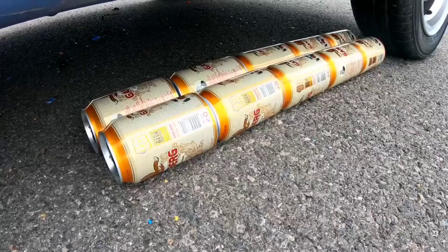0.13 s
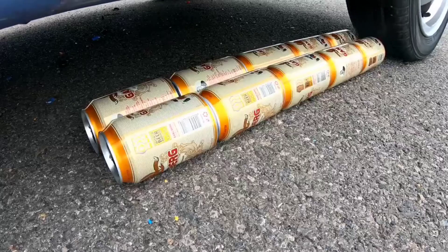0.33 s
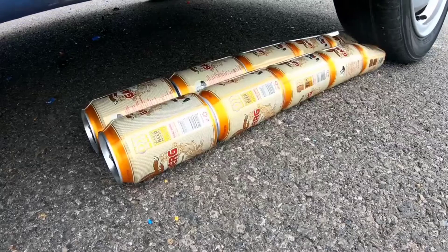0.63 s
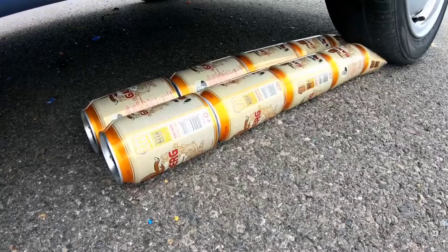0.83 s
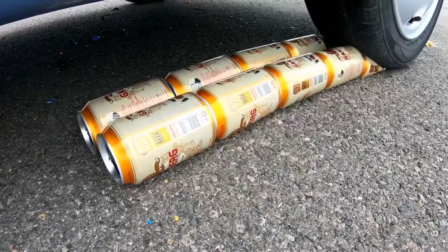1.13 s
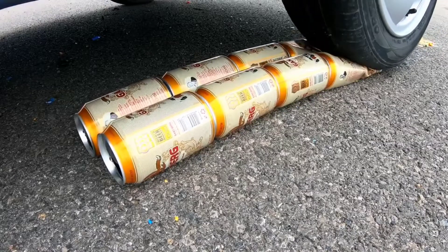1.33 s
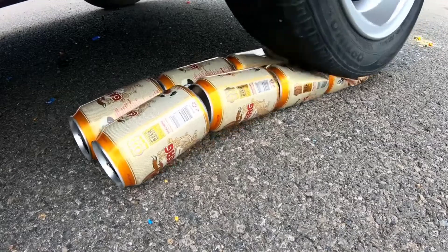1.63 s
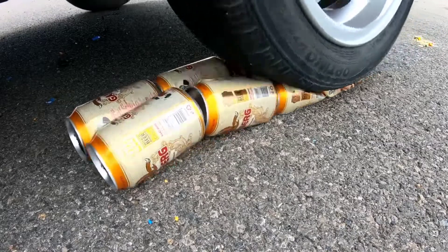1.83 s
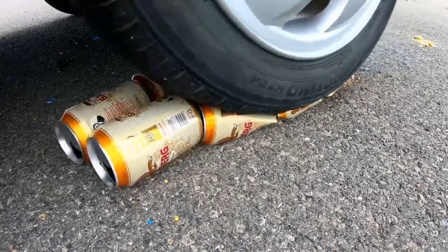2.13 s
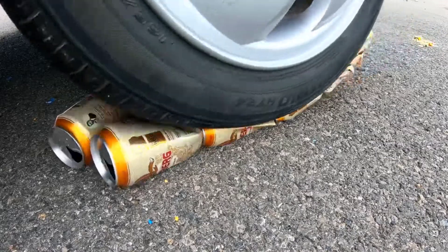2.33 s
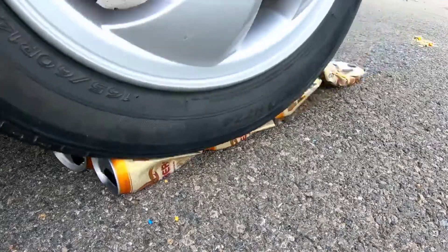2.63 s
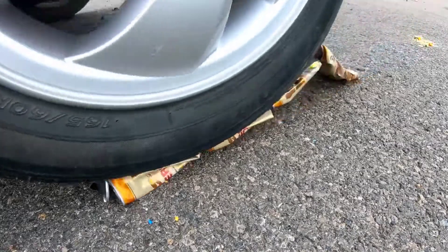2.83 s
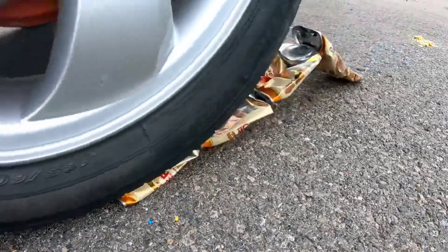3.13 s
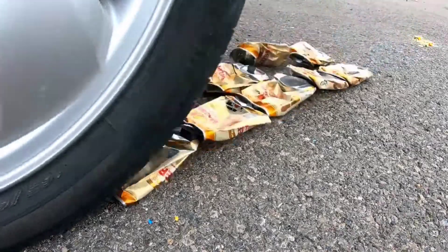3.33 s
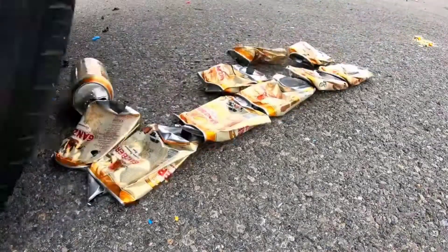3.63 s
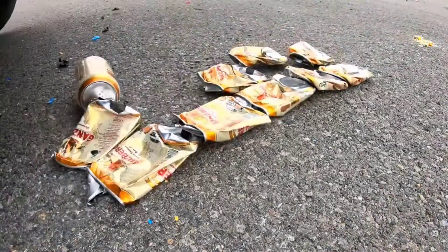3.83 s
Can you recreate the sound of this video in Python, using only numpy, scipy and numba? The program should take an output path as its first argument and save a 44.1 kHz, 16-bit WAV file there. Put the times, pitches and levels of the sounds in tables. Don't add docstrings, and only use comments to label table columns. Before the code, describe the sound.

After a short engine idle, a tyre crushes two rows of thin metal cans with hollow thuds, crackling creases and sharp tears, nearer cans brighter and wider, ending in scraping; close and dry outdoors.

```python
import sys
import numpy as np
from scipy import signal
from scipy.fft import rfft, irfft, next_fast_len
from scipy.io import wavfile
from scipy.ndimage import uniform_filter1d
from numba import njit

SR = 44100
rng = np.random.default_rng(int(sys.argv[2]) if len(sys.argv) > 2 else 0)


def output_pcm(signal):
    pcm = np.clip(np.atleast_2d(signal).T, -1, 1) * 32767
    wavfile.write(sys.argv[1], SR, np.round(pcm).astype(np.int16))


def volts_from_db(level):
    exponent = np.asarray(level, float) / 20
    return 10 ** exponent


N = 176400

# (frequency [Hz], level [dB per Hz])
ENGINE_COLOUR = [(40, -1.5), (400, -9), (900, -18.5), (970, -20.5), (4700, -29), (5600, -42),
                 (10500, -48.5), (12500, -69)]
# (frequency [Hz], width [Hz], level [dB])
BLOCK_RINGS = [(740, 200, 9.5), (1236, 120, 17.5)]
# (frequency [Hz], level [dB rms])
ENGINE_HUM = [(26.9, -50.5)]
# (time [s], gain [dB])
CAMERA_GAIN = [
    (.82, 8),
    (3.3, 4.5),
    (3.6, 3.5),
    (4.0, -6.5),
]
# (time [s], peak level [dB], pitch [Hz])
BODY_THUDS = [(0.133, -8.5, 240), (0.55, -8, 92), (0.879, 2.5, 218), (0.949, 4.5, 238), (1.046, -3.5, 247),
              (1.166, -2.5, 312), (1.441, -4, 43.5), (1.625, -2, 212), (1.703, 1, 161), (1.986, 2.5, 162),
              (2.133, 1.5, 130), (2.277, 0, 192), (2.374, 3.5, 312), (2.378, 1, 112), (2.626, -2.5, 149),
              (2.754, 2.5, 390), (3.035, 2.5, 244), (3.155, -1, 342), (3.183, -3.5, 304), (3.246, 2, 224),
              (3.248, -4, 95)]
# (time [s], creaking [dB], side width [dB], hollow rumble [dB], treble crackle [dB])
TYRE_LOAD = [
    (.8, -80, -4, 21, -32),
    (.84, -27.5, -8, -12.5, -44),
    (1.3, -24, -8, -14, -48),
    (2.0, -18, -10, -6, -19),
    (2.6, -22.5, 8.5, -5.5, -21),
    (3.25, -23, 11, -5.5, -17),
    (3.4, -26, 9.5, -14, -17),
    (3.84, -24.5, 12.5, -33, -19),
    (3.89, -75, 16, -29, -24),
]
# (start [s], length [s], level [dB])
CRUMPLE_SPELLS = [(0.834, 0.085, -17.5), (0.947, 0.016, -15.5), (1.153, 0.049, -20), (1.211, 0.021, -20),
                  (1.252, 0.04, -20), (1.335, 0.039, -16.5), (1.386, 0.036, -18.5), (1.453, 0.043, -21),
                  (1.513, 0.017, -17), (1.606, 0.03, -14.5), (1.679, 0.066, -14), (1.77, 0.13, -15.5),
                  (1.934, 0.054, -24.5), (2.023, 0.1, -16.5), (2.119, 0.045, -14), (2.224, 0.064, -15.5),
                  (2.35, 0.014, -17), (2.379, 0.07, -20), (2.479, 0.026, -21), (2.539, 0.026, -21),
                  (2.63, 0.038, -30.5), (2.726, 0.033, -24.5), (2.776, 0.1, -27.5), (2.822, 0.056, -22.5),
                  (2.85, 0.046, -37), (2.937, 0.023, -24), (2.975, 0.031, -27), (3.031, 0.019, -19),
                  (3.147, 0.04, -18.5), (3.237, 0.016, -24)]
# (frequency [Hz], level [dB per Hz])
SHEET_COLOUR = [(180, -18), (300, 1.5), (620, -5), (1440, -2), (3750, -3.5), (4570, -9), (5660, -25),
                (9140, -23), (15500, -58)]
# (frequency [Hz], width [Hz], level [dB])
WALL_RINGS = [(1060, 87, -3.5), (1430, 270, 6), (1980, 340, 3.5)]
# (frequency [Hz], width [Hz], level [dB])
HOLLOW_GROANS = [(148, 69, -1.5), (272, 82, -1.5), (424, 68, -8)]
# (time [s], peak level [dB], ring pitch [Hz])
WALL_TEARS = [(0.84, -35, 6980), (0.852, -18.5, 7860), (0.9022, -26, 6510), (0.951, -37, 8260),
              (1.0824, -27, 8400), (1.146, -35, 5800), (1.162, -29, 7100), (1.2526, -21, 7490),
              (1.3462, -35, 5570), (1.3476, -20.5, 7050), (1.3926, -24, 6300), (1.4474, -41, 9700),
              (1.4649, -30, 6990), (1.5203, -29, 8600), (1.5786, -47, 5880), (1.6016, -28, 8970),
              (1.63, -35, 5710), (1.7667, -32, 9200), (1.7935, -17, 8820), (1.8804, -24, 8450),
              (1.9293, -24, 8500), (1.9584, -19.5, 7300), (1.9827, -38, 6530), (2.0271, -21.5, 9690),
              (2.0313, -21, 8510), (2.062, -17.5, 8600), (2.142, -22.5, 8600), (2.2193, -34, 6590),
              (2.2436, -30, 9700), (2.3364, -47, 6000), (2.3519, -30, 6610), (2.3785, -28, 9600),
              (2.39, -19.5, 7000), (2.409, -21, 6200), (2.496, -21, 10000), (2.5463, -24, 6700),
              (2.6274, -22, 5600), (2.728, -31, 6280), (2.747, -23, 7300), (2.7774, -16.5, 9070),
              (2.816, -18.5, 8700), (2.8575, -20.5, 10260), (2.8805, -20.5, 6190), (2.9236, -20, 5500),
              (2.9902, -14, 6830), (3.032, -23, 5700), (3.0942, -16.5, 6870), (3.1271, -25, 5700),
              (3.174, -18.5, 6470), (3.236, -18, 5830), (3.288, -23, 6640), (3.3087, -20.5, 6200),
              (3.3924, -29, 6300), (3.4249, -24.5, 5700), (3.4694, -27, 6200), (3.5414, -14, 5870),
              (3.626, -16, 5900), (3.7098, -22.5, 6760), (3.7568, -16.5, 6500), (3.9194, -47, 6500)]
# (time [s], peak level [dB], ring pitch [Hz])
PANEL_SNAPS = [(0.849, -11, 668), (0.867, -8.5, 637), (0.877, -7.5, 1420), (0.949, -9.5, 1564),
               (1.083, -10.5, 1650), (1.151, -20, 1780), (1.165, -12.5, 2120), (1.187, -10, 1484),
               (1.198, -9.5, 1456), (1.239, -14, 1630), (1.307, -10.5, 1450), (1.336, -13.5, 804),
               (1.393, -9, 2480), (1.449, -12, 2290), (1.463, -9.5, 1217), (1.527, -10, 1365),
               (1.58, -9.5, 3800), (1.603, -8, 877), (1.63, -10.5, 1960), (1.672, -10, 1916),
               (1.697, -13, 4600),
               (1.796, -10, 1265), (1.882, -8.5, 1200), (1.926, -12, 795), (1.958, -9, 980),
                (1.983, -12, 750), (2.021, -12.5, 1514), (2.081, -11.5, 3150), (2.225, -14, 1390),
                (2.244, -15, 1150), (2.272, -7, 1510), (2.305, -11.5, 1860), (2.39, -9, 1770),
                (2.415, -9.5, 1815), (2.542, -9, 1000), (2.603, -10, 3720), (2.629, -8, 1930),
               (2.728, -13, 2440), (2.779, -16.5, 2800), (2.882, -13.5, 1240), (2.924, -16, 787),
              (2.955, -13.5, 995), (2.99, -6, 1960), (3.033, -13, 742), (3.093, -14, 740),
              (3.215, -16.5, 1900), (3.308, -15.5, 3550), (3.404, -15, 822), (3.541, -8.5, 4750),
              (3.625, -8.5, 1904), (3.64, -16, 2010), (3.709, -21.5, 857), (3.754, -15.5, 750),
              (3.758, -12, 2860), (3.919, -33.5, 920)]
# (frequency [Hz], width [Hz], level [dB])
SKID_RINGS = [(763, 82, 15), (1070, 220, 12.5), (1825, 210, 9.5), (2720, 530, 5.5), (3690, 870, -7)]
# (frequency [Hz], side level against the middle [dB])
STEREO_WIDTH = [(40, -21), (300, -47), (700, -24.5), (3000, -25), (8000, -7), (15000, -8)]

FIRING_HZ, PUFF_DEPTH = 28.55, 0.22
ENGINE_DB, BLOCK_DB, WIND_DB = -35, -11, -37.5
THUD_CYCLES, THUD_TRIM_DB, THUD_RISE_S = 5.8, 2, 0.00098
SPELL_RISE_S, SPELL_FALL_S = 0.0074, 0.0048
CREASE_CYCLES, CREASE_SPREAD_DB, CREASE_RISE_S = 13, 3, 0.00054
CREASE_DB, RASP_DB, RUMBLE_DB = -7, -7.5, -1.5
TEAR_TICK_DB, TEAR_HISS_DB, TEAR_RING_DB = 0, -10.5, 2
TICK_T60_S, TEAR_T60_S, TEAR_RISE_S = 0.0051, 0.12, 0.00067
SNAP_CYCLES, SNAP_T60_S, SNAP_RISE_S = 24.4, 0.026, 0.00028
CLANK_DB, RATTLE_DB, RATTLE_T60_S = -4, -7.5, 0.05
SKID_START_S, SKID_END_S, SKID_DB = 3.39, 3.865, -29.5
PAN_DB, CAMERA_START_S = -1.5, 0.1262


def unit(x):
    return x / np.sqrt(np.mean(x ** 2))


def noise():
    return rng.standard_normal(N)


def along(table, column):
    points = np.array(table)
    return np.interp(np.arange(N) / SR, points[:, 0], points[:, column])


def colour(x, points):
    size = next_fast_len(N + 8192)
    hz = np.maximum(np.arange(size // 2 + 1) * SR / size, 1)
    points = np.array(points)
    gain = volts_from_db(np.interp(np.log(hz), np.log(points[:, 0]), points[:, 1]))
    cepstrum = irfft(np.log(gain), size)
    cepstrum[1:size // 2] *= 2
    cepstrum[size // 2 + 1:] = 0
    return irfft(rfft(x, size) * np.exp(rfft(cepstrum)), size)[..., :N]


def band(x, hz, width):
    return signal.lfilter(*signal.iirpeak(hz, hz / width, fs=SR), x)


def walk(rate):
    hold = int(SR / rate)
    steps = np.repeat(rng.standard_normal(N // hold + 1), hold)
    return 1.3 * uniform_filter1d(uniform_filter1d(steps, hold), hold)[:N]


def resonate(x, peaks, swing_db, rate):
    total = 0
    for hz, width, db in peaks:
        ringing = band(band(x, hz, 1.03 * width), hz, 1.03 * width)
        total = total + volts_from_db(db + swing_db * walk(rate)) * ringing
    return unit(total)


@njit
def rings(at, hz, t60, size, rise_s, n, sr):
    out = np.zeros(n)
    closing = np.exp(-1 / (rise_s * sr))
    for k in range(len(at)):
        turn = np.exp((2j * np.pi * hz[k] - np.log(1000) / t60[k]) / sr)
        swing = size[k] + 0j
        start = int(at[k] * sr)
        gap = 1.
        for j in range(start, min(n, start + int(.7 * t60[k] * sr))):
            gap *= closing
            out[j] += swing.imag * (1 - gap)
            swing *= turn
    return out


def decays(at, size, t60):
    kicks = np.zeros(N)
    np.add.at(kicks, (at * SR).astype(int), size)
    return signal.lfilter([1], [1, -np.exp(-np.log(1000) / (t60 * SR))], kicks)


def engine():
    t = np.arange(N) / SR
    turn = 2 * np.pi * np.cumsum(FIRING_HZ * (1 + 0.044 * walk(2.59))) / SR
    puffs = noise() * (1 + PUFF_DEPTH * np.cos(turn))
    body = unit(colour(puffs, ENGINE_COLOUR))
    body = body + volts_from_db(BLOCK_DB) * resonate(puffs, BLOCK_RINGS, 3.5, 7.66)
    hum = 0
    for hz, db in ENGINE_HUM:
        hum = hum + volts_from_db(db + 6.3 * walk(14)) * np.sin(2 * np.pi * hz * t + 3.0 * walk(3.5))
    wind = unit(band(band(noise(), 22.4, 28), 27, 31)) * volts_from_db(WIND_DB + 1.7 * walk(3.46))
    gain_db = along(CAMERA_GAIN, 1)
    return volts_from_db(ENGINE_DB) * body * volts_from_db(gain_db) + (hum + wind) * volts_from_db(.5 * gain_db)


def thuds():
    at, db, hz = np.array(BODY_THUDS).T
    swings = rings(at, hz, THUD_CYCLES / hz, volts_from_db(db + THUD_TRIM_DB), THUD_RISE_S, N, SR)
    return band(swings, 304, 650)


def tyre_push():
    t = np.arange(N) / SR
    push = volts_from_db(along(TYRE_LOAD, 1) + 2 * walk(30))
    for start, length, db in np.array(CRUMPLE_SPELLS):
        rise = (t - start) / SPELL_RISE_S + 1
        fall = (start + length - t) / SPELL_FALL_S + 1
        push += volts_from_db(db) * np.clip(np.minimum(rise, fall), 0, 1)
    return push


def crumple(count=3900, size=3):
    push = tyre_push()
    chance = rng.uniform(0, 1, (count, 4))
    strike = np.arange(count) // size * size
    at = chance[strike, 0] * (N - 1) / SR
    hz = 400 * 2 ** (3.7 * chance[:, 1])
    force = volts_from_db(CREASE_SPREAD_DB * np.minimum(-np.log(1 - chance[strike, 2]), 3))
    t60 = CREASE_CYCLES * (.5 + 3 * chance[:, 3] ** 3) / hz + 0.0076
    strength = force * np.sqrt(hz)
    even = colour(rings(at, hz, t60, strength, CREASE_RISE_S, N, SR), SHEET_COLOUR)
    pushed = strength * push[(at * SR).astype(int)]
    creases = colour(rings(at, hz, t60, pushed, CREASE_RISE_S, N, SR), SHEET_COLOUR)
    creases = creases / np.std(even)

    rasp = unit(colour(noise(), SHEET_COLOUR)) * unit(decays(at, force, 0.067))
    rasp = rasp + .4 * resonate(rasp, WALL_RINGS, 6, 14)
    fizz = unit(colour(rasp, [(5000, -24), (12000, -3)]))
    fizz = fizz * volts_from_db(along(TYRE_LOAD, 4) + 2)
    rumble = resonate(noise(), HOLLOW_GROANS, 3, 14) * volts_from_db(RUMBLE_DB + along(TYRE_LOAD, 3))
    crackle = volts_from_db(CREASE_DB) * creases + volts_from_db(RASP_DB) * push * (rasp + fizz)
    return crackle + uniform_filter1d(push, 1500) * rumble


def tears():
    at, db, hz = np.array(WALL_TEARS).T
    air = unit(colour(noise(), [(2500, -14), (4500, 8), (6000, -4), (10000, -3.5), (11500, -17.5),
                                (15500, -20)]))
    hiss = decays(at, volts_from_db(db + TEAR_TICK_DB), TICK_T60_S)
    hiss = hiss + decays(at, volts_from_db(db + TEAR_HISS_DB), TEAR_T60_S)
    hiss = uniform_filter1d(hiss, int(TEAR_RISE_S * SR) + 1) * volts_from_db(3.7 * walk(150))
    ring = rings(at, hz, np.full(len(at), .02), volts_from_db(db + TEAR_RING_DB), TEAR_RISE_S, N, SR)
    return air * hiss + band(ring, 5300, 5600)


def snaps():
    at, db, hz = np.array(PANEL_SNAPS).T
    ringing = rings(at, hz, SNAP_T60_S + SNAP_CYCLES / hz, volts_from_db(db), SNAP_RISE_S, N, SR)
    chance = rng.uniform(-0.759, 1, (len(at), 8))
    for k in range(4):
        side_hz = np.clip(hz * 2 ** (1.184 * chance[:, k]), 300, 5200)
        late = at + 0.0038 * np.abs(chance[:, 4 + k])
        ringing += rings(late, side_hz, 0.011 + 8 / side_hz, volts_from_db(db + CLANK_DB), SNAP_RISE_S, N, SR)
    ringing = colour(ringing, [(5000, 1), (7000, -35), (12000, -21)])
    crack = colour(decays(at, volts_from_db(db + 18) * np.sign(chance[:, 0]), .0006), SHEET_COLOUR)
    rattle = unit(colour(noise(), SHEET_COLOUR)) * decays(at, volts_from_db(db + RATTLE_DB), RATTLE_T60_S)
    return ringing + crack + rattle


def skid():
    t = np.arange(N) / SR
    grit = noise() ** 3 * volts_from_db(2.3 * walk(40))
    fade = np.clip(np.minimum(t - SKID_START_S, SKID_END_S - t) / 0.006, 0, 1)
    return resonate(grit, SKID_RINGS, 1.2, 17) * volts_from_db(SKID_DB) * fade


def scene():
    mid = engine() + thuds() + crumple() + tears() + snaps() + skid()
    smears = rng.standard_normal((4, 128)) * np.exp(-np.arange(128) / 42.0)
    spread = 0
    for smear in smears:
        smear = smear / np.sqrt(4 * np.sum(smear ** 2))
        spread = spread + walk(24.984) * signal.fftconvolve(mid, smear)[:N]
    side = colour(spread, STEREO_WIDTH) * volts_from_db(along(TYRE_LOAD, 2))
    pan_db = PAN_DB * np.clip(np.arange(N) / SR - 2.3, 0, 1)
    return (mid + side * np.array([[1], [-1]])) * volts_from_db(np.array([pan_db, -pan_db]) / 2)


def roll_off(x):
    return signal.sosfilt(signal.butter(12, 15950, fs=SR, output="sos"), x)


def record(dry):
    switched_on = np.clip((np.arange(N) / SR - CAMERA_START_S) / 0.014, 0, 1)
    rounded = np.tanh(0.64 * dry * switched_on) / 0.94
    heard = colour(rounded, [(10600, -1), (11400, 0.0), (14000, 2.5), (15800, -12)])
    steep_top = signal.ellip(10, .2, 80, 15800, fs=SR, output="sos")
    mix = signal.sosfilt(steep_top, heard)
    return roll_off(mix)


dry = scene()
out = record(dry)
output_pcm(out)
```